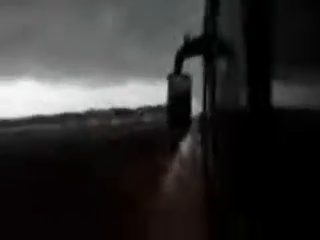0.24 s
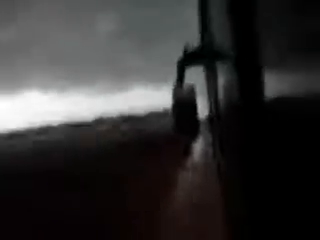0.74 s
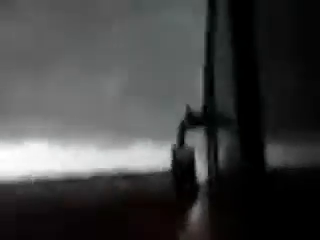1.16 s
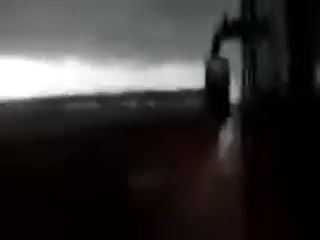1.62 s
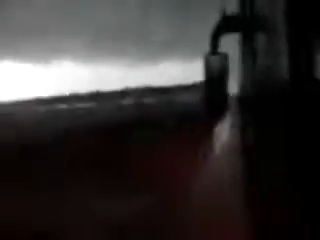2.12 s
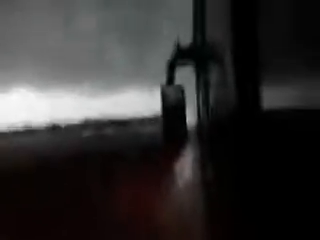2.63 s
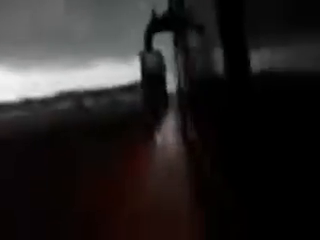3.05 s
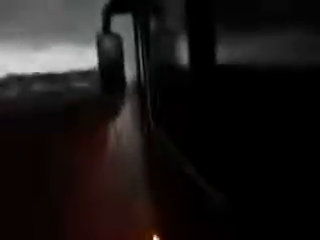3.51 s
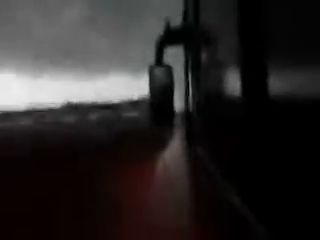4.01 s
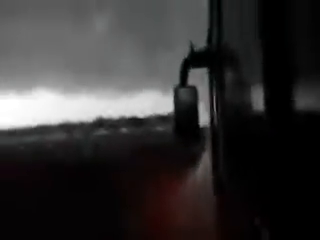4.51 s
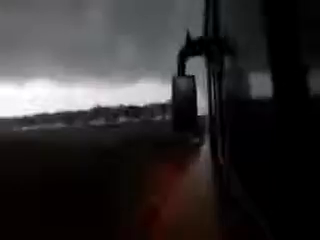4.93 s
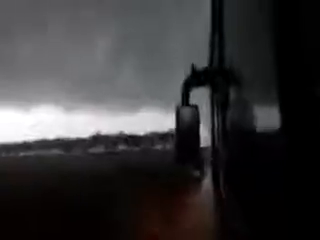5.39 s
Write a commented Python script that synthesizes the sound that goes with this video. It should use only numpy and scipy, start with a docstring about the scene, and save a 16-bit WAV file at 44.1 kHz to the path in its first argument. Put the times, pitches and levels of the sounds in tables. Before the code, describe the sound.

Rain hisses on a vehicle's windows while wind roars against the cab and thumps the microphone, a low engine hum fading underneath.

```python
"""A storm heard from a vehicle's cab, by the side window, in mono. After a moment of silence, everything
cuts in: wind rumbles on the microphone, roars on the panels and rushes through a window gap, while rain
hisses on the glass over a faint engine hum. Soon heavy drops tick, gusts slap the microphone and flung
water swishes. Near 3.5 s the strongest gust hits, then dies in a falling throb. Toward the end the
rain hardens, the rush through the gap grows louder and wider, and the engine fades."""
import sys
import numpy as np
from scipy import signal
from scipy.fft import rfft, irfft, next_fast_len
from scipy.io import wavfile
from scipy.ndimage import uniform_filter1d, map_coordinates

SR = 44100
rng = np.random.default_rng(int(sys.argv[2]) if len(sys.argv) > 2 else 0)


def bounce(signal):
    """Save signal as a 16-bit WAV file at the path given by the first command-line argument."""
    frames = np.transpose(np.atleast_2d(signal))
    limited = np.clip(frames, -1, 1)
    pcm = np.round(limited * 32767).astype(np.int16)
    wavfile.write(sys.argv[1], SR, pcm)


N = 249606


def amp(db):
    """Turn decibels into a number to multiply by."""
    return 10 ** (np.asarray(db) / 20)


def unit(x):
    """Scale a signal to an average strength (rms) of 1."""
    return x / np.sqrt(np.mean(x ** 2) + 1e-20)


def clock():
    """The time of every sample, in seconds."""
    return np.arange(N) / SR


def curves(rows, t):
    """Join a table's rows with straight lines and read each column at times t."""
    times, *columns = np.transpose(rows)
    return [np.interp(t, times, column) for column in columns]


def wobble(rate):
    """A smooth curve through `rate` random points a second."""
    points = rng.standard_normal(int(N * rate / SR) + 4)
    return unit(map_coordinates(points, [np.arange(N) * rate / SR]))


def filtered(x, response):
    """Turn each pitch in x up or down by response(hz)."""
    size = next_fast_len(N + SR // 2)
    return irfft(rfft(x, size) * response(np.fft.rfftfreq(size, 1 / SR)), size)[:N]


def coloured(x, spectrum):
    """Give x the tone in a (pitch_hz, gain_db) table, at strength 1."""
    pitches, db = np.transpose(spectrum)
    return unit(filtered(x, lambda hz: amp(np.interp(np.log(hz + 1), np.log(pitches + 1), db))))


def swept(x, gain, patchy_db):
    """Change the tone over time by gain(hz, t), with random patches like swirling air."""
    hz, t, slices = signal.stft(x, SR, nperseg=512)
    patches = uniform_filter1d(uniform_filter1d(rng.standard_normal(slices.shape), 8, 0), 12, 1)
    shaped = slices * gain(hz[:, None], t) * amp(patchy_db * unit(patches))
    return signal.istft(shaped, nperseg=512)[1][:N]


def bell(x, centre, width):
    """A smooth hump: 1 at the centre, about 0.6 one width away."""
    return np.exp(-.5 * ((x - centre) / width) ** 2)


def patter(rate, spread_db, fade_s):
    """About `rate` uneven hits a second, each a burst of noise that drops 60 dB in fade_s."""
    hits = (rng.random(N) < rate / SR) * amp(spread_db * np.clip(rng.standard_normal(N), -2, 2))
    energy = signal.lfilter([1], [1, -amp(-120 / (fade_s * SR))], hits ** 2)
    return unit(np.sqrt(energy) * rng.standard_normal(N))


# Tone of the deep rumble and of the ragged bursts: pitch_hz, gain_db
RUMBLE_TONE = [(8, -6.5), (20, 4), (36, 1.5), (55, -2.5), (90, -7.5), (140, -12.5), (220, -21), (400, -42),
               (1000, -82.5)]
BURST_TONE = [(40, -24), (90, -0.5), (150, 2), (250, -2), (420, -3.5), (650, -12), (1200, -18), (3000, -63)]
# Steady wind on the microphone: time_s, rumble_gain_db, burst_gain_db
STEADY_WIND = [(.22, -22, -30.5), (.75, -24, -32), (1.2, -17.5, -31), (1.7, -19.5, -28), (2.05, -14, -28),
               (2.25, -22.5, -29), (2.39, -17.5, -29.5), (2.55, -23.5, -29), (3.3, -20, -27),
               (3.62, -17.5, -28), (3.82, -21.5, -31), (4.3, -21, -28), (4.8, -17.5, -30), (5.1, -21, -36),
               (5.66, -20, -35.5)]

def buffeting():
    """Swirling air hits the microphone: a deep rumble and ragged bursts, both louder in a gust."""
    rumble_db, burst_db = curves(STEADY_WIND, clock())
    gust = gusts(clock())
    swirls = coloured(rng.standard_normal(N), RUMBLE_TONE)
    # even out the swirls' own swells, so the wind and gusts set the loudness
    strength = np.sqrt(np.abs(uniform_filter1d(swirls ** 2, size=SR // 6)))
    rumble = np.hypot(amp(rumble_db + 2), amp(-1) * gust) * swirls / strength
    ragged = rng.standard_normal(N) + amp(1) * patter(rate=200, spread_db=2.5, fade_s=0.027)
    bursts = np.hypot(amp(burst_db), gust) * coloured(ragged, BURST_TONE)
    return rumble + bursts


# Pitches at which the panels ring: pitch_hz, width_hz, boost_db
PANEL_RINGS = [(572, 26, 4.5), (844, 35, 1.5), (1024, 45, 1.5), (1340, 38, 3), (1640, 65, 2),
               (1890, 55, 2.5), (2530, 90, 1.5)]
# Tone of the roar: pitch_hz, gain_db
ROAR_TONE = [(150, -14.5), (400, -9.5), (650, -2), (950, -0.5), (1350, -1.5), (1750, -0.5), (2100, -2.5),
             (2550, -4.5), (3000, -11), (5000, -31), (9000, -63)]
# Strength of the storm, also used by rain(): time_s, roar_gain_db, hiss_gain_db
STORM_STRENGTH = [(.22, -27.5, -30.5), (.62, -25.5, -28), (.9, -25.5, -29.5), (1.37, -24.5, -28.5),
                  (1.47, -27.5, -32.5), (1.72, -26.5, -32.5), (1.82, -24.7, -28.3), (1.94, -28, -28.5),
                  (2.2, -27, -26.5), (2.7, -27, -26), (2.92, -26.5, -29.5), (3.3, -27.3, -25.5),
                  (3.8, -24.5, -26.5), (4.33, -23, -23), (4.64, -23, -22), (5.15, -24, -23),
                  (5.45, -23, -22.5), (5.66, -24.5, -21.5)]

def roar():
    """Wind and rain drum on the cab's panels: brighter when stronger, thinner in a strong draught."""
    def tone(hz, t):
        _, draught_db = curves(GAP_AIR, t)
        force_db, _ = curves(STORM_STRENGTH, t)
        bright_db = 0.52 * (force_db + 28) * bell(hz, 1400, 280)
        hollow_db = 0.15 * (draught_db + 33.5) * bell(hz, 650, 250)
        return amp(bright_db - hollow_db)
    def panels(hz):
        return amp(sum(db * bell(hz, pitch, width) for pitch, width, db in PANEL_RINGS))
    roar_db, _ = curves(STORM_STRENGTH, clock())
    drumming = rng.standard_normal(N) + amp(-2.5) * patter(rate=260, spread_db=3.5, fade_s=0.025)
    ringing = filtered(drumming, panels)
    body = swept(coloured(ringing, ROAR_TONE), tone, patchy_db=0.96)
    return amp(roar_db + 1.27 + 0.27 * wobble(12)) * unit(body)


# The draught through the window gap: time_s, pitch_hz, gain_db
GAP_AIR = [(.22, 2680, -27.5), (.6, 3070, -25.5), (.85, 2770, -26.5), (1.35, 2660, -28), (1.7, 2350, -30),
           (2.0, 2560, -29.5), (3.2, 2480, -48), (4.2, 2550, -32), (5.0, 2680, -28.5), (5.66, 2820, -20)]

def window_gap():
    """Air in the gap rushes around one pitch that drifts with the wind, with little sound above it."""
    def resonance(hz, t):
        pitch_hz, _ = curves(GAP_AIR, t)
        ratio = hz / pitch_hz
        broad_peak = ratio ** 2 / np.hypot(1 - ratio ** 2, ratio / 2.8)
        return broad_peak / np.sqrt(1 + (ratio / 1.01) ** 36)
    _, draught_db = curves(GAP_AIR, clock())
    air = swept(rng.standard_normal(N), resonance, patchy_db=1.0)
    return amp(draught_db - 3.5) * unit(air)


# Tone of the rain: pitch_hz, gain_db
RAIN_TONE = [(400, -16), (1200, 1), (2400, -4), (3000, -0.5), (3500, -.5), (4600, 1), (5500, 0.5),
             (6300, -0.5), (6800, -3), (7050, -6.5), (7600, -12.5), (8100, -20), (8700, -77.5)]
# The highest part of the hiss comes and goes: time_s, boost_db
RAIN_TREBLE = [(.22, 0), (1.1, -2.5), (2.1, 5.5), (2.55, 5), (2.85, -0.5), (3.15, 0.5), (3.65, -10),
               (4.05, 0.5), (4.4, -6.5), (5.66, -6.5)]

def rain():
    """Fine spray and countless small drops hiss on the glass, sizzling more as the rain hardens."""
    def tone(hz, t):
        _, force_db = curves(STORM_STRENGTH, t)
        treble_db, = curves(RAIN_TREBLE, t)
        sizzle_db = 0.36 * (force_db + 24) * bell(hz, 4750, 450)
        return amp(sizzle_db + treble_db * bell(hz, 7700, 550))
    _, hiss_db = curves(STORM_STRENGTH, clock())
    drops = rng.standard_normal(N) + amp(-6) * patter(rate=420, spread_db=5.0, fade_s=0.014)
    hiss = unit(swept(coloured(drops, RAIN_TONE), tone, patchy_db=1.0))
    return amp(hiss_db + 2.07 + 0.38 * wobble(16)) * hiss


# Loudness of the engine: time_s, gain_db
ENGINE_LEVEL = [(.22, -26.5), (1.45, -27.5), (2.0, -35), (3.8, -34.5), (5.66, -42.5)]
# Tones in its hum: multiple_of_firing_rate, gain_db
ENGINE_TONES = [(1, 0), (2, 0.5), (3, -5), (4, -17), (5, -11)]

def engine():
    """The engine's firing booms softly in the cab as a stack of low tones."""
    engine_db, = curves(ENGINE_LEVEL, clock())
    firing_hz = 67.56 - 0.35 * clock()  # slows very slightly
    phase = 2 * np.pi * np.cumsum(firing_hz * (1 + 0.006 * wobble(9))) / SR
    hum = sum(amp(db + 1.2 * wobble(4.8)) * np.sin(multiple * phase + 2 * np.pi * rng.random())
              for multiple, db in ENGINE_TONES)
    return amp(engine_db) * hum


# Heavy drops landing on the cab: start_s, gain_db
DROP_HITS = [(0.388, -22.5), (0.594, -24.5), (1.390, -16), (2.543, -19.5), (3.091, -11), (3.459, -21),
             (3.882, -19), (4.058, -27), (4.277, -21.5), (4.649, -22)]

def heavy_drops():
    """Heavy drops knock on the panels, tick on the glass and die at once."""
    t, fade_s = clock(), 0.022
    level = sum(amp(db - 60 * np.abs(t - start) / fade_s) * (t >= start) for start, db in DROP_HITS)
    knock = coloured(level * rng.standard_normal(N), ROAR_TONE)
    tick = coloured(level * rng.standard_normal(N), RAIN_TONE)
    return np.std(level) * (amp(-1.5) * knock + amp(-1) * tick)


# Gusts that hit the microphone: peak_s, gain_db, rise_s, fall_s
GUST_HITS = [(.555, -21, .028, .025), (1.385, -24, 0.035, 0.018), (1.92, -16, .025, .03),
             (2.01, -20.5, 0.021, 0.046), (2.25, -24.5, .03, .04), (3.06, -24.5, .06, 0.048),
             (3.32, -24, 0.027, 0.027), (3.455, -14.5, .08, 0.09), (3.6, -18, .02, .025),
             (5.61, -31, 0.027, 0.065)]

def gusts(t):
    """How hard the gusts push in buffeting(): each swells and dies away."""
    return sum(amp(db) * bell(t, peak, np.where(t < peak, rise, fall))
               for peak, db, rise, fall in GUST_HITS)


# Swirls of air that slap the microphone: start_s, gain_db, pace_hz
SWIRL_HITS = [(0.555, -12, 257), (1.387, -10.5, 237), (1.880, -7.5, 335), (1.909, -2.5, 145),
              (1.924, -8.5, 189), (1.946, -4, 140), (2.243, -15, 198), (3.414, -3.5, 60.3),
              (3.468, -5.5, 126), (3.584, -12, 96.5), (4.464, -7.5, 44.7), (5.586, -8.5, 109)]

def slaps():
    """Each strong swirl is a brief push and pull of air that slows as it passes."""
    out = np.zeros(N)
    for start_s, db, pace_hz in SWIRL_HITS:
        age = np.maximum(clock() - start_s, 0) * pace_hz
        cycles = 1.78 * np.log1p(age)  # the pitch falls from 1.78 times pace_hz
        out += amp(db) * np.sin(2 * np.pi * cycles) * np.exp(-age / 1.2)
    return out


# Swishes of water and, near the end (at 3260 Hz), a wider rush of air through the window gap:
# peak_s, level_db, width_s, pitch_hz
SWISHES = [(.63, -31.5, .11, 6100), (1.27, -32.5, .08, 5060), (2.17, -24, .009, 5660),
           (2.85, -35.5, 0.16, 6620), (3.018, -24, .007, 5560), (3.117, -28, .01, 5700),
           (3.191, -27, .01, 5640), (3.306, -37, .08, 6150), (3.579, -37.5, 0.1, 5130),
           (4.023, -32, .08, 6070), (5.1, -30, .16, 6200), (5.56, -27.5, 0.14, 3260),
           (5.57, -24.5, .11, 4640)]

def swishes():
    """Water on the glass or air in the gap swells and fades, each swish at its own pitch."""
    out = np.zeros(N)
    for peak_s, db, width_s, pitch_hz in SWISHES:
        noise = rng.standard_normal(N)
        swish = filtered(noise, lambda hz: bell(hz, pitch_hz, 420) + amp(-26) * bell(hz, 4500, 2000))
        out += amp(db) * bell(clock(), peak_s, width_s) * unit(swish)
    return out


def falling_throb():
    """As the strongest gust eases, swirls peel off the window edge ever more slowly."""
    peak_s, width_s, pitch_at_peak_hz, slowing_s = 3.683, 0.028, 75.1, 0.12
    cycles = pitch_at_peak_hz * slowing_s * np.exp(np.minimum((peak_s - clock()) / slowing_s, 2))
    level = amp(-9 + 1.2 * wobble(40)) * bell(clock(), peak_s, width_s)
    return level * np.sin(2 * np.pi * (cycles + rng.random()))


def scene():
    """Everything meets at one microphone."""
    steady = buffeting() + roar() + window_gap() + rain() + engine()
    mono = steady + heavy_drops() + slaps() + swishes() + falling_throb()
    return np.array([mono, mono])


def record(dry):
    """The sound cuts in, with its biggest peaks rounded off and its highest pitches removed."""
    start_s, fade_in_s, top_hz = 0.213, 0.011, 8550
    opened = dry * np.clip((clock() - start_s) / fade_in_s, 0, 1)
    rounded = opened / (1 + np.abs(opened) ** 8) ** (1 / 8)
    return np.array([filtered(side, lambda hz: hz < top_hz) for side in rounded])


dry = scene()
out = record(dry)
bounce(out)
```